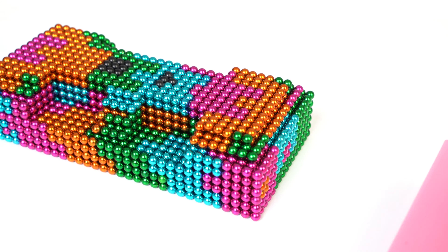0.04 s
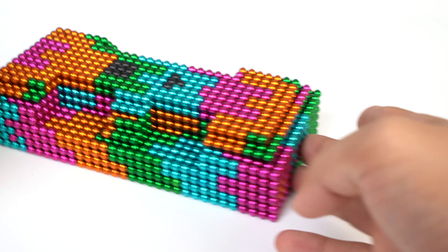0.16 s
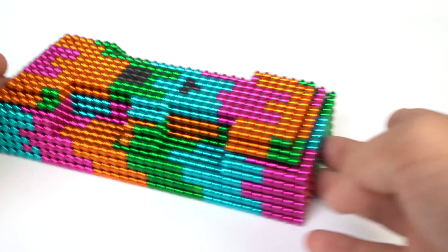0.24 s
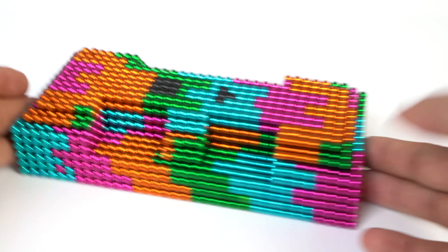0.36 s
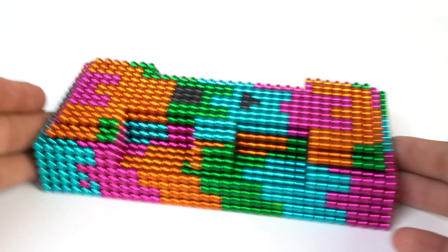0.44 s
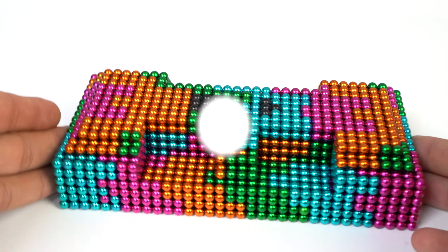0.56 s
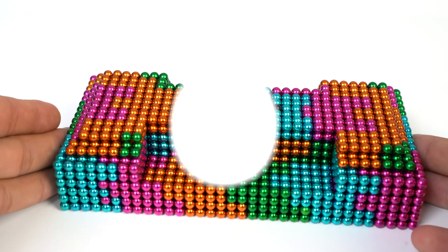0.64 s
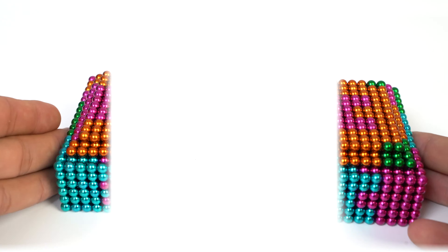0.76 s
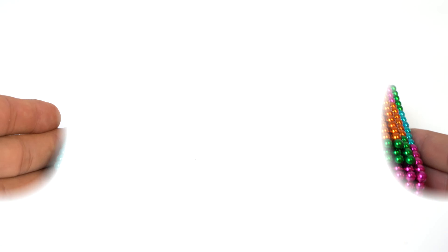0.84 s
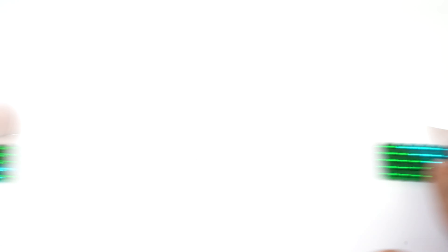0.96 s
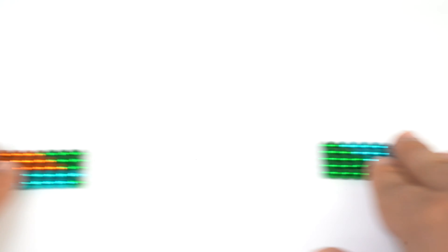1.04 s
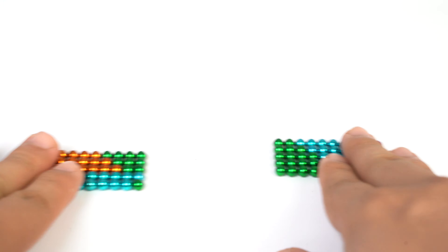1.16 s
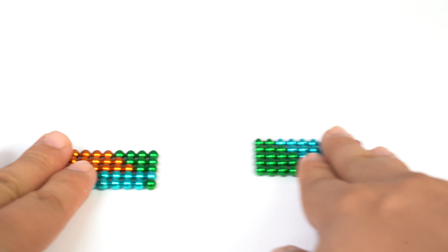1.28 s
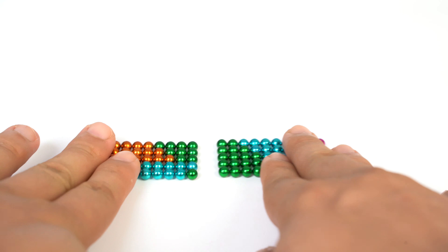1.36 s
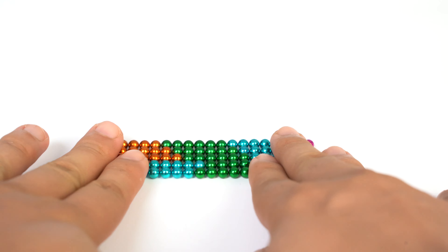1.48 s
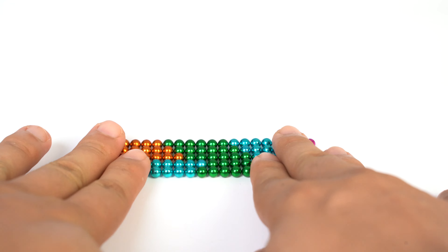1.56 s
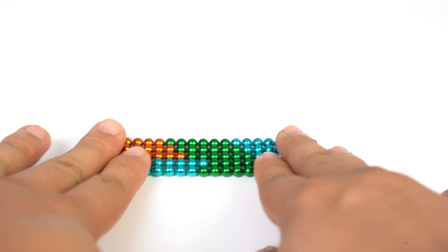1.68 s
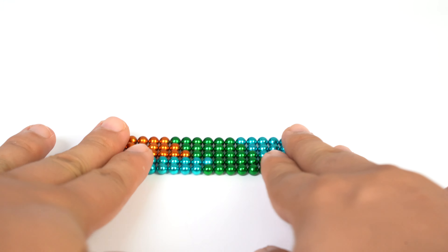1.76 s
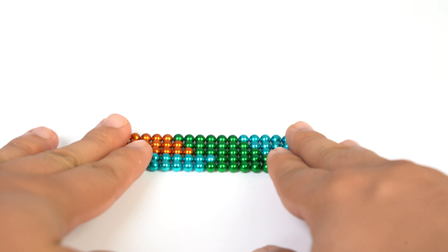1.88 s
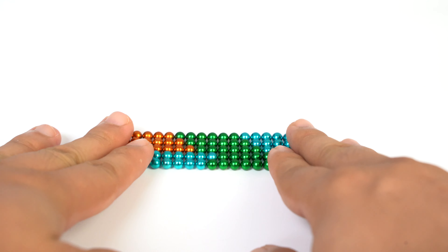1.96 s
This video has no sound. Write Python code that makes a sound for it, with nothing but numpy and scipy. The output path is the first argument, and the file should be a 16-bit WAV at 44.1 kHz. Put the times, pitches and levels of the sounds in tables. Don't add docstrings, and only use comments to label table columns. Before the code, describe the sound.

Magnetic steel balls scrape over a hollow table, close up in a small hard room. A faint ring dies until 0.15 s, cutting to a small squeak and a heavy, rumbling, juddering drag, loudest around 0.35-0.6 s, fading by 0.7. Lighter bars rub brighter from 0.83, strongest near 1.0-1.15, easing until 1.43. Near-quiet, then a loud bright snap at 1.53, short ringing, and soft finger presses around 1.8.

```python
import sys
import numpy as np
from scipy import signal
from scipy.fft import rfft, irfft
from scipy.io import wavfile
from scipy.ndimage import uniform_filter1d

SR = 44100
rng = np.random.default_rng(int(sys.argv[2]) if len(sys.argv) > 2 else 0)


def gain_from_decibels(decibels):
    exponent = np.asarray(decibels, float) / 20
    return 10 ** exponent


def digitize_waveform(pressure):
    field = np.atleast_2d(pressure).T
    bounded = np.clip(field, -1, 1)
    quanta = np.round(bounded * 32767).astype(np.int16)
    wavfile.write(sys.argv[1], SR, quanta)


N = 90405
T = np.arange(N) / SR


def unit(x):
    return x / np.sqrt(np.mean(x ** 2))


def colour(x, points):
    hz, db = np.array(points, float).T
    f = np.arange(N // 2 + 1) * SR / N + 1
    return irfft(rfft(x) * gain_from_decibels(np.interp(np.log(f), np.log(hz), db)), N)


def band(x, hz, width_hz):
    return signal.lfilter(*signal.iirpeak(hz, hz / max(width_hz, 2.), fs=SR), x)


def ring(x, modes):
    return sum(gain_from_decibels(db) * band(band(x, hz, w), hz, w) for hz, w, db in modes)


def low(x, hz):
    return signal.sosfiltfilt(signal.butter(2, hz, fs=SR, output="sos"), x)


def high(x, hz):
    return signal.sosfilt(signal.butter(4, hz, "high", fs=SR, output="sos"), x)


def walk(rate_hz):
    return unit(low(rng.standard_normal(3 * N), rate_hz)[N:2 * N])


# (hiss [dB], hum frequency [Hz], hum level [dB])
FLOOR = [
    (-67, 80, -88),
    (-67, 112, -49),
    (-78, 137.2, -58.5),
    (-64.5, 580, -89.5),
]
HUM_WIDTH_HZ = 30


def floor(hiss_db, hum_hz, hum_db):
    hiss, hum = rng.standard_normal((2, N))
    hiss_on = (T < SPLICES_S[3]) | (T > SNAPS[0][0])
    drone = unit(band(band(hum, hum_hz, HUM_WIDTH_HZ), hum_hz, HUM_WIDTH_HZ))
    return gain_from_decibels(hiss_db) * hiss * hiss_on + gain_from_decibels(hum_db) * drone


ROOM_T60_S, ROOM_TREBLE_T60_S, ROOM_RISE_S = 0.35, 0.35, 0.007


def echo():
    t = T[:SR]
    noise = rng.standard_normal(SR)
    bass = low(noise, 2500.)
    tail = bass * gain_from_decibels(-60 * t / ROOM_T60_S) + (noise - bass) * gain_from_decibels(-60 * t / ROOM_TREBLE_T60_S)
    tail = tail * (1 - np.exp(-t / ROOM_RISE_S))
    return tail / np.sqrt(np.sum(tail ** 2))


# (time [s], frequency [Hz], level [dB], t60 [s])
KNOCKS = [
    (1.847, 76, -59, .4),
    (1.847, 250, -61, .25),
    (1.63, 225, -59, 1.2),
    (1.775, 705, -54, 3),
    (1.785, 782, -51, 2.5),
    (1.78, 845, -57, 1.2),
    (.05, 931, -50, .15),
    (1.455, 690, -57, 1.5),
    (1.95, 72, -62, .6),
    (.885, 840, -36, .5),
]
KNOCK_RISE_S, KNOCK_WOBBLE_DB = .006, 3


def thud():
    out = 0
    for s, hz, db, t60_s in KNOCKS:
        t = np.maximum(T - s, 0)
        level = gain_from_decibels(db - 60 * t / t60_s + KNOCK_WOBBLE_DB * walk(25))
        out = out + level * (1 - np.exp(-t / KNOCK_RISE_S)) * np.sin(2 * np.pi * hz * t)
    return out


# (frequency [Hz], width [Hz], level [dB])
BITE_MODES = [(1755, 30, 10.5), (2120, 120, 6.5), (2410, 120, 5), (2654, 150, 7.5), (2780, 88, 4),
              (4074, 32, 16.5), (4500, 120, -5.5), (5040, 88, -0.5), (6200, 89, 1.5), (6750, 160, -5),
              (7560, 120, -12), (8730, 140, -22), (10200, 150, -30), (11400, 150, -20)]
BITE_S, BITE_LENGTH_S = .161, 0.037
BITE_DB, BITE_SCRAPE_DB = -44, -17
BITE_LINGER = .25


def bite():
    t = np.maximum(T - BITE_S, 0) / BITE_LENGTH_S
    noise = rng.standard_normal(N)
    scrape = unit(band(noise, 4500., 5020.0))
    squeak = unit(ring(noise, BITE_MODES)) + gain_from_decibels(BITE_SCRAPE_DB) * scrape
    decay = np.exp(-t ** 2) + BITE_LINGER * np.exp(-t / 3)
    return gain_from_decibels(BITE_DB) * squeak * np.minimum(8 * t, 1) * decay


# (time [s], level [dB], brightness [dB per octave])
SNAPS = [
    (1.5311, -24, -10),
    (1.5340, 1.5, -2),
    (1.5332, -19, 1),
    (1.5347, -1, -1),
    (1.5354, -.5, 0),
    (1.5363, 2, 1.5),
    (1.5370, -1.5, 2.5),
    (1.5378, -11, 1.5),
    (1.5386, -11, 1),
    (1.5399, -14, 0),
]
# (frequency [Hz], level [dB], t60 [s])
CHAIN = [(2700, -14, .004), (3500, -17, .003), (4300, -17, .003), (5500, -19, .003), (6900, -15, .003),
         (9000, -3, .0035), (10500, -3, .003), (11950, 0, .0035), (12800, -1, .003), (13900, -4, .003),
         (14800, -8, .003)]
# (frequency [Hz], level [dB])
SNAP_ROOM_COLOUR = [(59, -63), (100, -57.5), (386, -4.5), (477, -28), (682, -7.5), (1340, -12.5),
                    (1590, -10), (15500, -23.5)]
# (frequency [Hz], width [Hz], level [dB])
SNAP_TABLE = [(387.5, 31, 8), (707, 100, -4), (867, 80, 3.5), (1100, 60, 3), (1314, 62, 13.5),
              (1506, 170, -2), (2030, 160, -5.5), (2898, 150, -2), (9100, 410, 0.5), (12900, 1800, -16.5)]
SNAP_DB, SNAP_ROOM_DB = 1, -15.5
DETUNE, UNEVEN_DB = .015, 2.5


def snap(room):
    out = np.zeros(N)
    chance = rng.standard_normal((len(SNAPS), 2, len(CHAIN)))
    t = T[:800]
    for (s, db, bright), (detune, uneven) in zip(SNAPS, chance):
        click = 0
        for (hz, g, t60_s), d, c in zip(CHAIN, detune, uneven):
            level_db = g + UNEVEN_DB * c + bright * np.log2(hz / 10000) - 60 * t / t60_s
            click = click + gain_from_decibels(level_db) * np.sign(c) * np.sin(2 * np.pi * hz * (1 + DETUNE * d) * t)
        click = high(click, 1400.0)
        i = int(s * SR)
        out[i:i + len(t)] += gain_from_decibels(db + SNAP_DB) * click / np.abs(click).max()
    hit = 1. * (np.arange(N) == int(SNAPS[1][0] * SR))
    tail = colour(signal.fftconvolve(hit, room)[:N], SNAP_ROOM_COLOUR)
    tail = tail + ring(tail, SNAP_TABLE)
    tail = tail - low(tail, 320.0)
    return out + gain_from_decibels(SNAP_ROOM_DB) * tail / np.abs(tail).max()


MID_HZ, TREBLE_HZ = 910, 3140


def three(x, gains):
    a, b = low(x, MID_HZ), low(x, TREBLE_HZ)
    return a * gains[0] + (b - a) * gains[1] + (x - b) * gains[2]


# (time [s], level over the even rub [dB])
JOLTS = [
    [(.008, 1), (.056, 8), (.095, 9)],
    [(.192, 1), (.212, 4.5), (.223, 10), (.242, 9), (.260, 4), (.269, 7.5), (.284, 7), (.294, 3), (.308, 2),
     (.328, 5.5), (.342, 3.5), (.355, -6.5), (.370, 6.5), (.388, -3.5), (.403, 6.5), (.414, -4), (.425, 1),
     (.436, 8), (.454, 6), (.459, 4), (.474, 0.5), (.495, 1), (.512, 12), (.522, -6), (.531, 2.5),
     (.549, 9.5), (.572, 2.5), (.588, 5), (.609, 5), (.627, 8.5), (.638, 11.5), (.650, 12), (.671, 7),
     (.680, 12), (.712, 15), (.727, -11), (.743, -6), (.769, 10), (.779, -15), (.792, -9), (.824, 1)],
    [(.865, 0), (.92, 4), (.99, 2.5), (1.076, 1.5), (1.107, 1.5), (1.151, 2.5), (1.192, 5), (1.229, 5),
     (1.278, 2), (1.306, 7), (1.388, 2), (1.425, -3)],
    [(1.516, -1), (1.785, 12), (1.80, 4), (1.815, 7.5), (1.83, 9)],
]
JOLT_TOPS_HZ = [1500, 1500, 7000, 1500]
JOLT_S = .0045
EVENNESS, EVENNESS_S = .8, .007


def judder(x, jolts, top_hz):
    body = low(x, top_hz)
    k = int(EVENNESS_S * SR)
    power = uniform_filter1d(uniform_filter1d(body ** 2, size=k), size=k)
    steady = (power / np.mean(power) + 0.099) ** (-EVENNESS / 2)
    jump_db = sum(db * np.exp(-((T - s) / JOLT_S) ** 2) for s, db in jolts)
    return x - body + body * steady * gain_from_decibels(jump_db - 3.5)


# (time [s], push [dB], speed [dB])
PUSH = [
    [(0, -34.5, -15), (.03, -47, -1), (.055, -55.5, 2), (.075, -56, 5), (.147, -66, 5)],
    [(.149, -42, -24), (.2, -27.5, -16.5), (.26, -14, -6), (.36, -6.5, -4.5), (.5, -9, 1), (.59, -12, -3),
     (.66, -26, -26), (.72, -33.5, -73), (.828, -39.5, -44)],
    [(.83, -48, -26), (.87, -36, -15.5), (.92, -19.5, -11), (.99, -11.5, -0.5), (1.06, -13, 7),
     (1.13, -11, 0.5), (1.2, -17.5, -2), (1.25, -20, -14), (1.3, -31, -12), (1.35, -29, -5),
     (1.39, -23, -12.5), (1.431, -26.5, -2)],
    [(1.433, -51.5, -23), (1.503, -41, -28.5), (1.511, -47, 11), (1.53, -28.5, 11), (1.6, -45.5, 10.5),
     (1.75, -64, 21), (1.81, -41, 0), (1.85, -51.5, 2.5), (2.05, -58, -16)],
]
# (frequency [Hz], level [dB per Hz])
RING_COLOUR = [(35, -70), (150, -42), (450, -26.5), (900, -25.5), (1300, -21.5), (3000, -36.5),
               (4500, -37.5), (15500, -46)]
HEAVY_COLOUR = [(70, -74), (170, -11.5), (312, -1), (1290, -17.5), (1500, -21), (2590, -27.5), (3580, -38),
                (15500, -48)]
LIGHT_COLOUR = [(60, -78), (190, -26), (420, -8.5), (1000, -2), (2400, -8.5), (6500, -28), (12500, -33),
                (15500, -33.5)]
PRESS_COLOUR = [(35, -44), (150, -59.5), (300, -35), (750, -40), (1350, -30.5), (2600, -30), (5000, -42),
                (15500, -44)]
# (frequency [Hz], width [Hz], level over the plain rub [dB])
RING_MODES = [(237, 51, 14), (474, 15, 23.5), (530, 30, 19), (925, 71, 24.5), (1246, 110, 9), (1300, 77, 5),
              (1730, 80, 9), (2350, 61, 4)]
HEAVY_MODES = [(113, 19, 7.5), (182.4, 26, 3.5), (218.5, 45, 13), (288, 72, 6.5), (309.1, 14, -4.5),
               (442.5, 27, -2), (525, 160, -2), (594, 40, 1), (641.5, 81, 2.5), (1305, 152, 4.5),
               (1930, 310, -21.5), (2580, 450, -9.5), (3238, 59, 7.5), (4230, 1300, -3.5)]
LIGHT_MODES = [(418, 7, 6.5), (683, 35, 5), (799, 100, 2), (857, 37, -1.5), (1198, 26, -11),
               (1348, 120, 3.5), (1375, 140, -8), (1680, 59, 3.5), (1873, 63, -2), (2270, 100, -2),
               (2680, 340, -8.5), (3030, 98, -4.5), (4180, 620, -7), (5900, 100, -1)]
PRESS_MODES = [(74, 75, 34), (227.4, 14, 42), (306, 4.1, 28.8), (430, 28, 7.6), (596, 52, 27),
               (708.7, 30, 45.7), (805, 20, 44.3), (810, 16, 12), (1284, 42, 24), (1378, 53, 27),
               (1376, 21, 11), (1994, 263, 14.5), (2426, 180, 11), (2800, 570, 3.2)]
# (share of speed dB in the mids [0-1], grain scatter [dB], bass flutter [dB],
# upper flutter [dB], room [dB])
FEEL = [
    (.5, 1.5, 2, 1.1, -12),
    (.45, 1.5, 1.1, .8, -11),
    (.4, 1.5, 1.1, .6, -12),
    (.6, 1.5, 2, 1.1, -12),
]
GRAINS_PER_S, FLUTTER_PER_S = 14000, 90


def rub(push, tint, modes, feel, jolts, top_hz, room):
    mids, scatter_db, bass_db, upper_db, room_db = feel
    s, push_db, speed_db = np.array(push).T
    push_db, speed_db = np.interp(T, s, push_db), np.interp(T, s, speed_db)
    slips, size = rng.random((2, N))
    grains = (slips < GRAINS_PER_S / SR) * gain_from_decibels(-scatter_db * np.log(size + 1e-9))
    grains = grains * rng.standard_normal(N)
    flutter = [gain_from_decibels(d * walk(FLUTTER_PER_S)) for d in (bass_db, upper_db, upper_db)]
    x = colour(three(grains, flutter), tint)
    x = judder(unit(x + ring(x, modes)), jolts, top_hz)
    direct = gain_from_decibels(push_db) * three(x, [1, gain_from_decibels(mids * speed_db), gain_from_decibels(speed_db)])
    return direct + gain_from_decibels(room_db) * signal.fftconvolve(direct, room)[:N]


SPLICES_S = [0, .148, .829, 1.4308, 2.06]
# (frequency [Hz], width [Hz], depth [0-1])
GAPS = [
    (1415, 200, 0.7),
    (3570, 320, 0.87),
]
SPLICE_FADE_S = .002
SQUASH = 1.25


def scene():
    room = echo()
    colours = RING_COLOUR, HEAVY_COLOUR, LIGHT_COLOUR, PRESS_COLOUR
    modes = RING_MODES, HEAVY_MODES, LIGHT_MODES, PRESS_MODES
    shots = [rub(*load, room) for load in zip(PUSH, colours, modes, FEEL, JOLTS, JOLT_TOPS_HZ)]
    shots[1] = np.tanh(SQUASH * shots[1]) / (SQUASH - .1) + bite()
    for hz, w, depth in [*GAPS, *GAPS]:
        shots[1] = shots[1] - depth * band(shots[1], hz, w)
    knocks = thud()
    shots[0] = shots[0] + knocks
    shots[2] = shots[2] + knocks
    shots[3] = shots[3] + snap(room) + knocks
    out = 0
    for x, background, start, end in zip(shots, FLOOR, SPLICES_S, SPLICES_S[1:]):
        since_start = T - start + SPLICE_FADE_S * (start == 0)
        fade = np.clip(np.minimum(since_start, end - T) / SPLICE_FADE_S, 0, 1)
        out = out + (x + floor(*background)) * fade
    return out[None]


def band_limit(x):
    return signal.sosfilt(signal.butter(12, 16100, fs=SR, output="sos"), x)


MIC_LOW_HZ, TOP_HZ = 70, 15750
GATE_DB, GATE_DEPTH_DB = -96, -11


def record(dry):
    x = high(dry, MIC_LOW_HZ)
    x = signal.sosfilt(signal.ellip(8, .2, 70, TOP_HZ, fs=SR, output="sos"), x)
    z = signal.stft(x, nperseg=1024, noverlap=768)[2]
    power = uniform_filter1d(np.abs(z) ** 2, size=3, axis=1)
    z = z * np.maximum(power / (power + gain_from_decibels(2 * GATE_DB)), gain_from_decibels(GATE_DEPTH_DB))
    mix = signal.istft(z, nperseg=1024, noverlap=768)[1][:, :N]
    return band_limit(np.clip(mix, -1, 1))


dry = scene()
out = record(dry)
digitize_waveform(out)
```